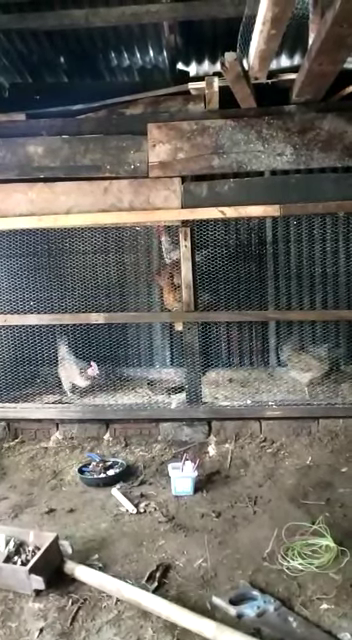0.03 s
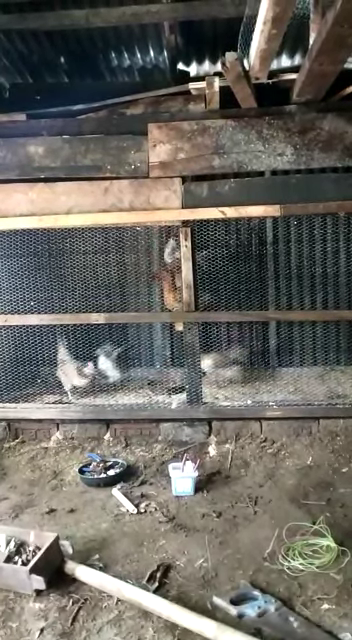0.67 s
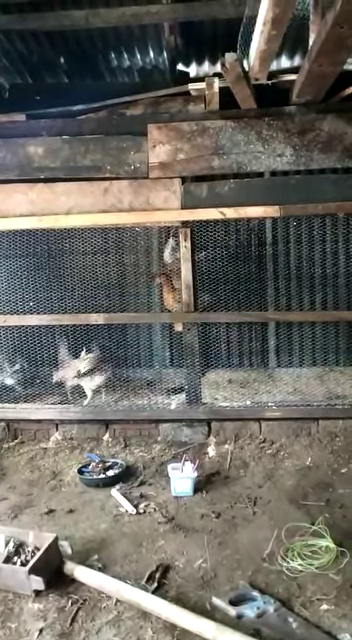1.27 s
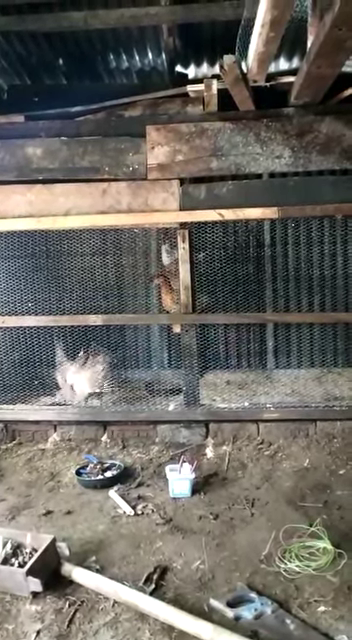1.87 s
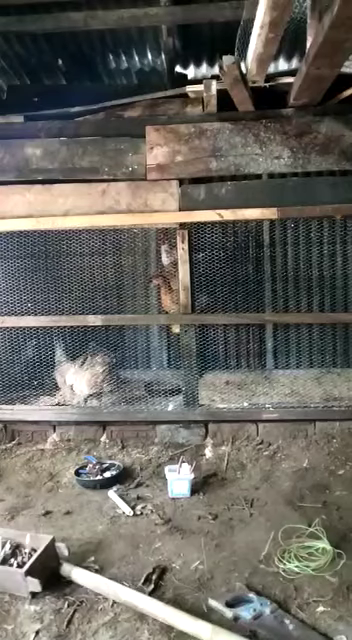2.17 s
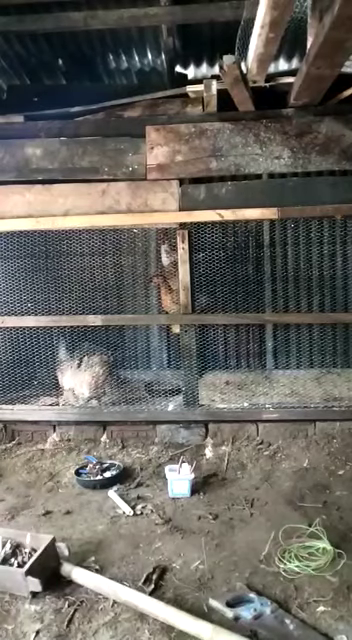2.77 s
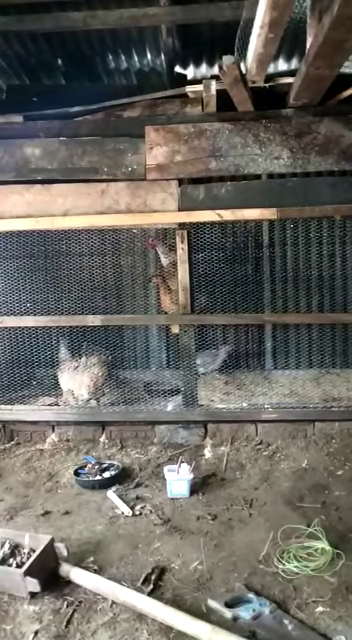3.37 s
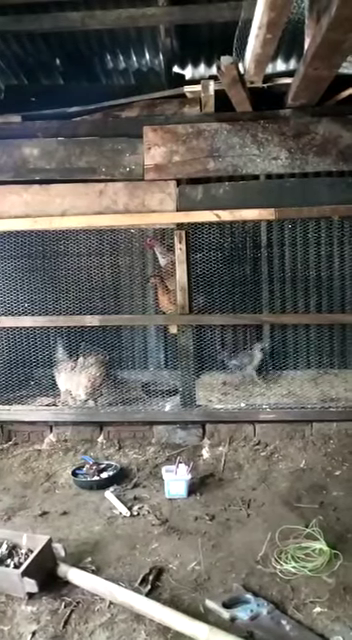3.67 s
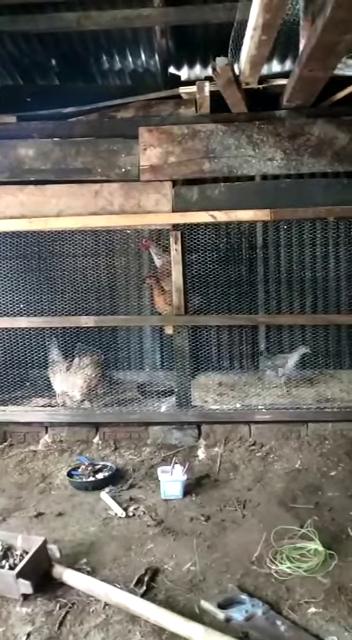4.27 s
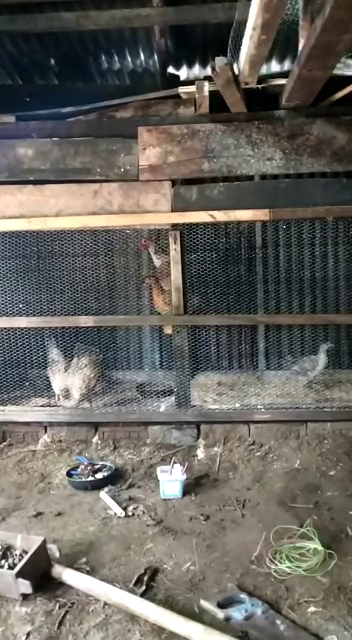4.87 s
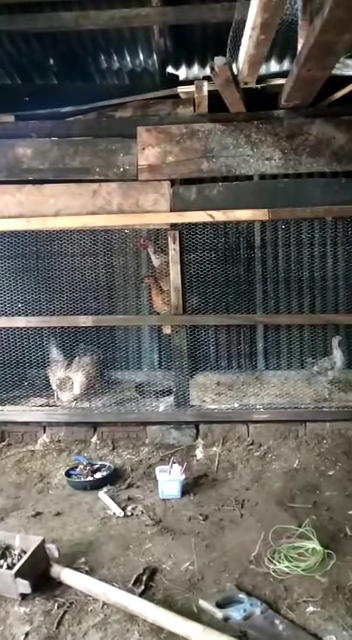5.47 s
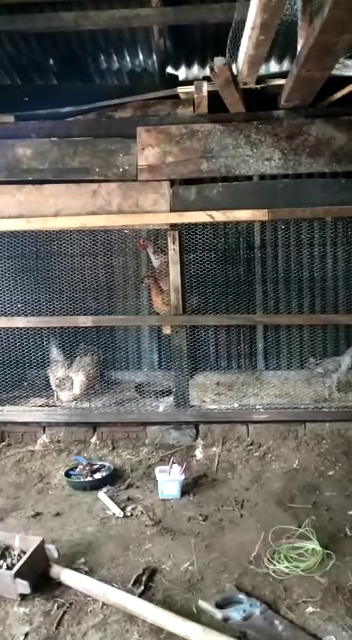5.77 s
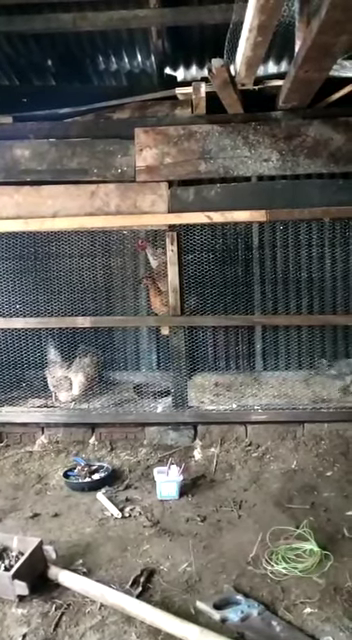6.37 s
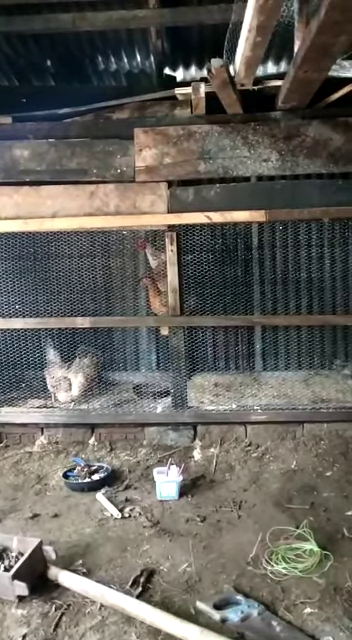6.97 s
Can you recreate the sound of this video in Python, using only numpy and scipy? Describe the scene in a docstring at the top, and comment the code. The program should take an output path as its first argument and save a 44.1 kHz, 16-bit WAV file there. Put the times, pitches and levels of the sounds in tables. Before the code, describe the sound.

From the start, hens scuffle in a wire pen inside a shed, a few steps away and slightly left. Short, harsh squawks come in quick succession until about 1.6 seconds, mixed with crackling wing beats and feet stirring dry litter. A soft landing thud comes at 0.6 seconds, and five dry wing claps fall between 0.7 and 1.3 seconds. From 1.6 seconds one hen settles into low clucks, mostly doubled, three or four a second. Another answers with soft, hoarse notes around 2.6 to 2.8 seconds and two small peeps near 3.2 seconds. After 5 seconds the clucks are quieter, lower and more scattered, continuing to the end at about 7 seconds. Faint foot scratches recur from 3 seconds onward. The shed adds a short echo. Outside, insects keep up a thin, high hiss, and a few distant birds chirp very faintly.

```python
"""Hens scuffle in a wire pen under a tin roof, with harsh squawks, wing beats and feet in the litter.
Then one hen settles into low double clucks while another answers with soft pitched notes.
The voices are pulses of air ringing in the throat; feathers and litter are crackling noise.
The shed adds a short echo. Outside, insects hiss with their wings and small birds chirp faintly."""
import sys
import numpy as np
from scipy import signal
from scipy.fft import rfft, irfft, next_fast_len
from scipy.io import wavfile

SR = 44100
rng = np.random.default_rng(int(sys.argv[2]) if len(sys.argv) > 2 else 0)


def unload_wav(signal):
    """Save mono or channel-first audio to the path in sys.argv[1] as 16-bit WAV at rate SR, clipped to [-1, 1]."""
    wavfile.write(
        sys.argv[1],
        SR,
        np.round(np.clip(np.atleast_2d(signal).T, -1, 1) * 32767).astype(np.int16),
    )


N = 309141
TIME = np.arange(N) / SR

# How alike the two ears hear noise. Each row: frequency in Hz, likeness from 0 to 1.
EAR_LIKENESS = [(150, 1), (350, 0.73), (700, 0.31), (1400, 0), (4000, 0.057), (16000, 0)]
# Squawks. Each row: start and length in seconds, peak time as a share of the length, pitch in Hz,
# pitch fall as a share, second and third harmonic in dB, roughness from 0 to 1, relative level in dB.
SQUAWKS = [(0.0, 0.013, 0.21, 675, -0.054, -8, -1, 0.17, -26.5),
           (0.05, 0.064, .5, 636, 0.0085, -1, -5, 0.44, -23),
           (0.112, 0.084, .3, 593, 0.15, 9, -12, 0.42, -38.5),
           (.178, 0.057, 0.45, 490.7, 0.055, 3.5, 1.5, 0.77, -24.5),
           (.273, 0.066, .6, 543.8, 0.031, -10, 3, 0.67, -23.5),
           (0.347, 0.037, 0.46, 685, 0.066, -16, -16, 0.69, -27.5),
           (0.458, 0.057, 0.53, 562, -.02, -4, 7.5, 0.65, -22.5),
           (0.571, 0.048, 0.62, 495.6, -0.06, -5.5, -6, 0.38, -26),
           (.683, 0.044, 0.63, 588.8, -0.035, -8, -4.5, 0.61, -22.5),
           (0.797, 0.039, 0.57, 494, -0.0018, -5, -8.5, 0.78, -29),
           (.918, 0.038, 0.72, 538.3, 0.028, 3, -2, 0.47, -22),
           (1.013, 0.046, .52, 545, .02, 7.5, -5.5, .6, -22),
           (1.073, 0.045, 0.53, 499.3, 0.057, 0.5, -11, 0.84, -28),
           (1.158, .04, .55, 669.7, 0.039, 3.5, -10.5, 0.55, -19.5),
           (1.275, .049, 0.56, 541, 0.015, 1, -0.5, 0.71, -21.5),
           (1.337, 0.048, 0.52, 602, 0.012, -3, -10.5, 0.61, -22),
           (1.507, 0.053, 0.45, 499.7, -0.014, 7, 8, 0.54, -23.5)]
# Wing strokes and feathers brushing the wire. Each row: start and length in seconds,
# then relative level, bass, upper middle and treble, all in dB.
WING_STROKES = [(0.0, 0.018, -19.5, -27, -4, -9.5), (.055, 0.069, -21, -3, 1, 3.5),
                (0.279, 0.072, -22.5, -10, 0, 1), (0.342, 0.058, -23.5, -15, 0, -5.5),
                (0.464, 0.059, -20, -3.5, 7.5, 7), (0.57, 0.064, -25.5, -13, -6, -4.5),
                (0.693, 0.048, -21.5, -0.5, -2, -4.5), (0.798, 0.038, -32, 6, -16, -17),
                (0.926, 0.045, -23.5, 12, 2.5, 4), (1.019, 0.055, -21, -0.5, 0, -2.5),
                (1.071, 0.065, -28.5, -8.5, 0.5, -7), (1.167, .043, -21, -5, 5.5, 5.5),
                (1.192, 0.049, -23.5, 14.5, 3, 6.5), (1.275, 0.05, -19, 17, 7.5, 9),
                (1.369, 0.046, -27, 23, 3.5, 9.5), (1.512, 0.061, -31.5, 8, 3.5, -2.5),
                (2, 0.04, -36.5, -2, -18, -32)]
# Wing tips clapping. Each row: start in seconds, relative level in dB.
WING_CLAPS = [(0.707, -13.5), (.937, -16), (1.033, -15), (1.176, -13), (1.3, -14.5)]
# The scuffle dying away. Each row: time in seconds, treading level in dB, rustling level in dB.
LITTER_STIR = [(0, -38, -35.5), (.4, -51, -56), (.68, -39.5, -43), (.88, -51, -52.5), (1.1, -43.5, -40),
               (1.35, -32.5, -32.5), (1.52, -41, -47), (1.7, -46, -52.5), (2.0, -46.5, -54.5),
               (2.35, -56, -63.5), (3.6, -58, -69), (4.25, -64.5, -59.5), (7.0, -72, -68)]
# A hen lands on the floor. One row: start and length in seconds, thud level in dB.
LANDING = (0.591, 0.053, -29)
# Feet raking the litter. Each row: start and length in seconds, scratch and thud levels in dB.
FOOT_RAKES = [(3.232, 0.16, -58, -53), (3.828, 0.17, -53.5, -54.5), (4.88, 0.34, -52, -61.5),
              (5.531, 0.12, -52, -65), (5.997, .13, -49, -60), (6.44, 0.15, -51.5, -54.5),
              (6.868, 0.13, -47, -54.5)]
# Insect choruses. Each row: frequency and width in Hz, level in dB.
INSECT_CHORUSES = [(7260, 400, -64), (8330, 1300, -62), (9260, 950, -57)]
# Cluck syllables, mostly in pairs. Each row: time in seconds, pops per second,
# then the relative levels of chest, upper throat and whole syllable in dB.
CLUCKS = [(0.605, 229, 4, -4, -30.5), (1.619, 228, -4.5, 1, -27), (1.891, 230.3, -3, 3.5, -28.5),
          (2.197, 218, 2, -14, -38), (2.229, 241.7, 0, 0, -28.5), (2.424, 211.5, -11, -2, -33),
          (2.458, 239.4, -1.5, -3, -27), (2.616, 226.5, 3.5, -8, -34), (2.657, 252.8, -10, 2.5, -23),
          (2.831, 228, -3, 5, -26), (2.871, 241, -3.5, -2, -22.5), (3.109, 206.4, -1, -13, -32),
          (3.148, 247.2, 2, 1, -24), (3.353, 206.6, -11, 2, -33.5), (3.395, 246.3, 1, 0.5, -23.5),
          (3.552, 206, -6.5, -7, -30.5), (3.588, 242.4, 0.5, -0.5, -24), (3.888, 206.8, -3, -2, -27),
          (3.924, 231.4, -0.5, -6, -26), (4.226, 190, -1.5, -5, -31), (4.259, 212.6, 4, -9, -36),
          (4.456, 172, -9, -6, -30.5), (4.493, 195.6, 0.5, -1, -26.5), (4.725, 184.3, -12, -7, -25.5),
          (4.762, 188.8, 1, 1.5, -28), (5.071, 179, 4, 0, -39), (5.369, 180.2, 3.5, 2.5, -36.5),
          (5.404, 199, 7, -5, -37.5), (5.735, 180.6, 4, 5, -38.5), (5.77, 202, 5, 1, -38),
          (5.924, 185.7, 1.5, -0.5, -34.5), (5.959, 207.5, 7, 5, -45), (6.263, 179, -0.5, 2.5, -30.5),
          (6.507, 181, 0, 0.5, -33.5), (6.915, 193.7, 6, 3, -39), (6.953, 203, 7, -7, -38.5)]
# Hums and far chirps. Each row: start and length in seconds, first and last pitch in Hz,
# relative level in dB.
MURMURS = [(.635, 0.049, 366, 493, -37.5), (5.505, 0.033, 234, 252, -54.5), (6.008, 0.033, 253, 241, -49.5),
           (6.452, 0.05, 310, 270, -53)]
BIRD_CHIRPS = [(1.662, 0.076, 2356, 2260, -56), (2.45, 0.032, 2340, 2360, -59),
               (4.44, 0.204, 4810, 4730, -65), (5.215, 0.096, 2720, 2680, -61.5)]
# Air pushed by a wing. Each row: start and length in seconds, level in dB.
AIR_PUFFS = [(0.912, 0.044, -55)]
# Soft answers. Each row: start and length in seconds, pitch and beak resonance in Hz,
# chest level and relative note level in dB.
SOFT_NOTES = [(2.561, .04, 261, 1560, 15, -43.5), (2.685, 0.043, 311.6, 1290, 6.5, -33.5),
              (2.819, 0.026, 319, 1540, 9, -45.5), (3.75, 0.031, 337, 1670, -1, -38)]
# High notes. Each row: start and length in seconds, pitch in Hz, first harmonic and note level in dB.
PEEPS = [(3.156, 0.051, 617, -28, -33), (3.283, 0.047, 625, -14, -34)]
# Resonances (tones at which a thing rings) of the throat, the wire pen and the boarded corner where
# the hen sits. Each row: frequency and width in Hz, relative level in dB.
OPEN_THROAT = [(500, 140, 1.5), (1074, 450, 8), (1640, 490, 6), (2010, 460, -2.5), (2920, 490, -7),
               (3830, 280, -12), (4900, 330, -5)]
CLUCK_THROAT = [(450, 160, 0.046), (688, 240, 1), (911, 119, -1.1)]
SOFT_THROAT = [(650, 270, 1.5), (1050, 100, 0), (1260, 110, 6), (1570, 140, 0.5)]
PEN_RESONANCES = [(1018, 20, -8), (1101, 24, -6.5), (1366, 23, -8), (1718, 20, -5), (2276, 22, -3),
                  (2670, 22, -2), (2940, 40, -6.5)]
CORNER_RESONANCES = [(249, 23.5, -1.5), (297.5, 15, 0.5), (344, 30, -3), (493, 43, -7), (567, 22, -5),
                     (629, 9.9, -4), (686, 21, -1.5), (796, 24, -14), (860.4, 25, 1.5), (932, 16.6, 0.5),
                     (1030, 35, -2), (1234, 28, 3.5), (1366, 23, -5.5)]
# The tone colour of each noise. Each row: frequency in Hz, relative level in dB.
FEATHER_SPECTRUM = [(60, -43), (150, -36), (250, -11), (700, -3), (1800, 7.5), (3300, -2), (5000, -0.5),
                    (6300, -6.5), (9000, 3), (11500, 0.5), (13000, -2), (16000, -5.5)]
CLAP_SPECTRUM = [(100, -38), (400, -16), (1000, -1), (1500, 14), (2400, -2.5), (3500, -15.5), (5000, -15.5),
                 (6500, -22), (9000, -4.5), (16000, -24)]
TREAD_SPECTRUM = [(40, -47.5), (100, -46.5), (160, -12.5), (240, 0.5), (400, -9), (800, -8), (1500, -18),
                  (3000, -18), (16000, -45)]
RUSTLE_SPECTRUM = [(100, -27), (500, -20), (1500, -9.5), (2500, -4), (5000, -4), (6300, -0.5), (9000, -1),
                   (12000, -1.5), (16000, -4.5)]
AIR_SPECTRUM = [(30, -40), (90, -29.5), (160, -4.5), (250, 6.5), (420, 0), (800, -4), (1500, -5),
                (3000, -2.5), (5000, -4.5), (5700, -5.5), (10500, -2.5), (13000, -9), (16000, -4)]


def from_db(db):
    """Turn decibels into a gain."""
    return 10 ** (np.asarray(db) / 20)


def rms_one(x):
    """Scale a sound to an average strength (rms) of 1."""
    return x / np.sqrt(np.mean(x ** 2) + 1e-20)


def add(track, start_s, sound):
    """Mix a sound into a track."""
    start = max(round(start_s * SR), 0)
    track[..., start:start + sound.shape[-1]] += sound[..., :N - start]


def at_hz(points, hz):
    """Read between the points of a curve, on a log-frequency axis."""
    knots, values = np.transpose(points)
    return np.interp(np.log(hz + 1), np.log(knots), values)


def keep_band(x, hz, kind, order=2):
    """Keep what is below hz ("low") or above it ("high")."""
    return signal.sosfilt(signal.butter(order, hz, kind, fs=SR, output="sos"), x)


def drift(per_s, size):
    """A random wander of about 1 either way, turning per_s times a second."""
    return np.interp(np.arange(size) * per_s / SR, np.arange(size), rng.standard_normal(size))


def resonate(x, modes):
    """Ring several resonances side by side and sum them with alternating signs."""
    out = 0
    for k, (hz, width, db) in enumerate(modes):
        r = np.exp(-np.pi * width / SR)
        poles = [1, -2 * r * np.cos(2 * np.pi * hz / SR), r * r]
        out = out + (-1) ** k * from_db(db) * (1 - r * r) / 2 * signal.lfilter([1, 0, -1], poles, x)
    return out


def swell(length_s, sharpness, crest=0.46):
    """Rise to 1 and fall again, peaking at the share crest of the length."""
    share = np.linspace(0, 1, round(length_s * SR), endpoint=False)
    return np.sin(np.pi * np.interp(share, [0, crest, 1], [0, .5, 1])) ** sharpness


def stereo_noise(spectrum, size=N, ripple_db=0.0, ripple_step_hz=180):
    """Coloured noise, alike in both ears only in the bass; ripple adds random resonances."""
    padded = next_fast_len(size)
    hz = np.fft.rfftfreq(padded, 1 / SR)
    mid, side = rfft(rng.standard_normal((2, padded)))
    alike = at_hz(EAR_LIKENESS, hz)
    both = np.sqrt(1 + alike) * mid + np.sqrt(1 - alike) * side * [[1], [-1]]
    ripple = np.interp(hz / ripple_step_hz, np.arange(len(hz)), rng.standard_normal(len(hz)))
    colour = from_db(at_hz(spectrum, hz) + ripple_db * ripple)
    return rms_one(irfft(both * colour, padded)[:, :size])


def crackle(size, per_s, spread_db):
    """A loudness curve made of many tiny, uneven snaps."""
    hits = rng.random(size) < per_s / SR
    snaps = hits * from_db(spread_db * np.minimum(rng.exponential(1, size), 3))
    energy = signal.lfilter([1], [1, -np.exp(-1 / (.0005 * SR))], snaps ** 2)
    return rms_one(np.sqrt(energy + .3))


def shed(x, early_db, tail_db, early_t60=0.22, tail_t60=0.46, echo_db=-16, echo_s=0.034):
    """Near boards and ground scatter the sound, the far wall echoes, a tail hangs under the roof."""
    t = TIME[:SR // 2]
    walls = [(100, 0), (1500, 3.0), (5000, -4.5), (16000, -9.5)]  # Hz, dB
    # a t60 is the seconds it takes to fade by 60 dB
    early = from_db(early_db - 60 * t / early_t60) / np.sqrt(early_t60)
    tail = from_db(tail_db - 60 * t / tail_t60) / np.sqrt(tail_t60)
    response = stereo_noise(walls, len(t)) * np.hypot(early, tail) * (t > .002) * np.sqrt(5.1 / SR)
    response[:, 0] += 1  # the direct sound
    response[:, round(echo_s * SR)] += from_db(echo_db)
    return signal.fftconvolve(np.atleast_2d(x), response, axes=1)


def voice_box(size, pitch_hz, jitter, doubling, rasp, arch):
    """Membranes pulse on an arched pitch, strong and weak in turn, each letting out a jet of noise."""
    bend = arch * (np.sin(np.linspace(0, np.pi, size)) - np.pi / 4)
    phase = 2 * np.pi * np.cumsum(pitch_hz * (1 + bend + jitter * drift(585, size))) / SR
    pulses = np.cos(np.arange(1, 20)[:, None] * phase).sum(axis=0)
    pulses *= 1 + doubling * np.cos(phase / 2)
    jet = rng.standard_normal(size) * (1 + np.cos(phase))
    return rms_one(pulses) + rasp * rms_one(jet)


def harmonics(hz, levels_db, jitter):
    """Pure tones at whole multiples of a slightly unsteady pitch."""
    phase = 2 * np.pi * np.cumsum(hz * (1 + jitter * drift(400, len(hz)))) / SR
    return sum(from_db(db) * np.sin(k * phase + rng.uniform(0, 2 * np.pi))
               for k, db in enumerate(levels_db, 1))


def squawks(gain_db=-1.3):
    """Short forced cries: a hoarse rasp, with clear tones breaking out at the height of the push."""
    out = np.zeros((2, N))
    for start, length, crest, pitch_hz, fall, second_db, third_db, rough, db in SQUAWKS:
        effort = swell(length, sharpness=1.09, crest=crest)
        size = len(effort)
        hz = pitch_hz * (1 + fall * np.linspace(.5, -.5, size) + .05 * (effort - .75))
        source = voice_box(size, hz, jitter=0.075 * rough, doubling=0.58 * rough,
                           rasp=2.0 * rough, arch=0.02)
        hoarse = effort * rms_one(keep_band(resonate(source, OPEN_THROAT), 560, "high"))
        clear = effort ** 1.8 * harmonics(hz, [-13, second_db, third_db], jitter=0.034 * rough)
        # the hen is on the run, so every cry meets different reflections
        heard = shed(hoarse, early_db=0, tail_db=-23.5) + shed(clear, early_db=-8.5, tail_db=-25)
        add(out, start, from_db(db + gain_db) * heard)
    return out


def feather_rattle(x):
    """Feather shafts snap in the middle range while their vanes crackle in the treble."""
    low = keep_band(x, 3500, "low", order=1)
    shafts = crackle(x.shape[-1], per_s=900, spread_db=3)
    vanes = crackle(x.shape[-1], per_s=700, spread_db=3.4)
    return keep_band(low * shafts + (x - low) * vanes, 150, "high", order=4)


def wings(gain_db=-0.6, shade_db=-11, clap_rise_s=0.0047, clap_decay_s=0.01):
    """Each stroke swishes through the feathers; the hardest end in a dry clap of the wing tips."""
    out = np.zeros((2, N))
    for start, length, db, bass_db, middle_db, treble_db in WING_STROKES:
        speed = swell(length, sharpness=0.72, crest=0.44)
        tone = [(450, bass_db), (1300, 0), (2800, middle_db), (5000, middle_db), (9000, treble_db)]
        colour = [(hz, level + at_hz(tone, hz)) for hz, level in FEATHER_SPECTRUM]
        quills = stereo_noise(colour, len(speed), ripple_db=4.5)  # new resonances on every stroke
        swish = from_db(db + gain_db) * speed * feather_rattle(quills)
        add(out, start, shed(swish, early_db=-3, tail_db=-11.5))
    t = TIME[:SR // 20]
    slap = np.minimum(t / clap_rise_s, 1) * np.exp(-t / clap_decay_s)
    for start, db in WING_CLAPS:
        clap = keep_band(slap * stereo_noise(CLAP_SPECTRUM, len(t)), 200, "high")
        add(out, start, shed(from_db(db) * clap, early_db=-9, tail_db=-14))
    # the treble is beamed to the left, so the right side is duller
    left, right = out
    dull = keep_band(right, 5140, "low", order=1)
    shade = from_db(shade_db)
    return np.array([left, shade * right + (1 - shade) * dull])


def pen(x, travel_s=.009):
    """The pen rings a moment after the loud scuffle."""
    out = x.copy()
    add(out, travel_s, sum(resonate(x, [mode]) for mode in PEN_RESONANCES))
    return out


def litter():
    """Feet tread dully and rustle the dry litter, with one landing and single rakes on top."""
    times, tread_db, rustle_db = np.transpose(LITTER_STIR)
    tread = from_db(np.interp(TIME, times, tread_db))
    scratch = from_db(np.interp(TIME, times, rustle_db))
    start, length, thud_db = LANDING
    add(tread, start, from_db(thud_db) * swell(length, sharpness=0.95))
    for start, length, scratch_db, thud_db in FOOT_RAKES:
        push = swell(length, sharpness=1)
        catching = from_db(drift(147, len(push)))  # the claws catch and slip
        add(scratch, start, from_db(scratch_db) * push * catching)
        add(tread, start, from_db(thud_db) * push)
    thuds = tread * from_db(2.0 * drift(50, N)) * stereo_noise(TREAD_SPECTRUM)
    rustle = scratch * crackle(N, per_s=900, spread_db=3.2) * stereo_noise(RUSTLE_SPECTRUM)
    return thuds + rustle * from_db([[2.5], [-1]])  # louder on the left


def insect_buzz(size, hz, width_hz):
    """The narrow, noisy ring of an insect's wings, a little to the left."""
    mode = [(hz, width_hz, 0)]
    ring = resonate(resonate(rng.standard_normal((2, size)), mode), mode)
    return rms_one(ring) * from_db([[1.1], [-1.1]])


def outdoors(air_db=-53.5, nearest_db=-57.5):
    """Still air, choruses of shrill insects and the short phrases of the nearest one."""
    out = from_db(air_db) * stereo_noise(AIR_SPECTRUM)
    for hz, width, db in INSECT_CHORUSES:
        out += insect_buzz(N, hz, width) * from_db(db + 2.4 * drift(8.4, N))
    phrase = swell(.33, sharpness=0.14)
    for start in np.arange(1.8, 7, .37):
        hz = 9250 + 180 * rng.standard_normal()
        buzz = phrase * insect_buzz(len(phrase), hz, width_hz=480)
        add(out, start, buzz * from_db(nearest_db + 2.2 * drift(60, len(phrase))))
    return out


def clucks(length_s=0.02806, lead_s=0.005474, fall=.2, unevenness=.13, gain_db=-15.0, corner_db=2):
    """A few uneven pops in the closed throat slow down as the push of air ends; the corner rings on."""
    out = np.zeros((2, N))
    effort = swell(length_s, sharpness=0.55)
    size = len(effort)
    for time, pulse_hz, chest_db, upper_db, db in CLUCKS:
        stretch = np.exp(0.037 * rng.standard_normal())  # the neck is never held twice alike
        pop_hz = pulse_hz * np.exp(np.linspace(fall, -fall, size) + unevenness * drift(299, size))
        cycles = np.cumsum(pop_hz) / SR + rng.random()
        pops = np.diff(np.floor(cycles), prepend=0) * from_db(3.2 * drift(408, size))  # one a cycle
        source = np.pad(effort * (pops + .014 * rng.standard_normal(size)), (0, size))
        throat = [(hz * stretch, width, level) for hz, width, level in CLUCK_THROAT]
        voice = resonate(source, [(265, 90, chest_db)] + throat + [(1240, 620, upper_db - 10.0)])
        voice = keep_band(voice, 1155, "low", order=4)
        voice = rms_one(keep_band(voice, 204, "high", order=6))
        add(out, time - lead_s, shed(from_db(db + gain_db) * voice, early_db=-5, tail_db=-12))
    ringing = sum(resonate(out, [mode]) for mode in CORNER_RESONANCES)
    return from_db(-1.5) * out + from_db(corner_db) * ringing


def glides(rows, waver, flutter_db, sharpness):
    """Nearly pure sliding notes with a fast quaver."""
    out = np.zeros(N)
    for start, length, start_hz, end_hz, db in rows:
        shape = swell(length, sharpness)
        size = len(shape)
        hz = np.linspace(start_hz, end_hz, size) * (1 + waver * drift(350, size))
        tone = np.sin(2 * np.pi * np.cumsum(hz) / SR)
        add(out, start, from_db(db + flutter_db * drift(97, size)) * shape * tone)
    return out


def murmurs():
    """A hen hums low between her clucks, with her beak shut."""
    hums = glides(MURMURS, waver=0.049, flutter_db=1.5, sharpness=0.96)
    return shed(hums, early_db=-3.5, tail_db=-3.0)[:, :N]


def wing_puff():
    """Air pushed by a wing arrives as a low thud."""
    gust = np.zeros(N)
    for start, length, db in AIR_PUFFS:
        add(gust, start, from_db(db) * swell(length, sharpness=1))
    return gust * rms_one(keep_band(rng.standard_normal((2, N)), 60, "low"))


def birds(gain_db=-3):
    """Thin whistles from far off, blurred by a quaver and by reflections on the way."""
    song = glides(BIRD_CHIRPS, waver=.036, flutter_db=2.5, sharpness=1)
    return from_db(gain_db) * shed(song, early_db=11.5, tail_db=11)[:, :N]


def soft_notes(gain_db=1.0):
    """Little hoarse notes through a nearly closed beak; the pitch rises and sinks with the push."""
    out = np.zeros((2, N))
    for start, length, pitch_hz, beak_hz, chest_db, db in SOFT_NOTES:
        effort = swell(length, sharpness=0.85)
        source = voice_box(len(effort), pitch_hz, jitter=0.03, doubling=0.12, rasp=0.66, arch=0.057)
        throat = resonate(source, SOFT_THROAT + [(280, 110, chest_db)])
        voice = throat + resonate(throat, [(beak_hz, 200, 3)])
        note = rms_one(keep_band(keep_band(voice, 2100, "low", order=6), 150, "high"))
        heard = shed(effort * note, early_db=-7, tail_db=-17, early_t60=.12, echo_db=-22)
        add(out, start, from_db(db + gain_db) * heard)
    return out


def peeps(arch=.045):
    """High, clean notes carried by the second harmonic, at twice the pitch."""
    out = np.zeros((2, N))
    for start, length, pitch_hz, first_db, db in PEEPS:
        effort = swell(length, sharpness=1.35)
        hz = pitch_hz * (1 + arch * (effort - effort.mean()))
        voice = rms_one(harmonics(hz, [first_db, 0, -26], jitter=.017))
        add(out, start, from_db(db) * shed(effort * voice, early_db=-8.5, tail_db=-28, echo_db=-28))
    return out


def scene():
    """The hens sound inside the shed, a little to the left, over the quiet outdoors."""
    leftward = from_db([[.3], [-.3]])
    talk = (clucks() + soft_notes() + peeps() + murmurs()) * leftward
    scuffle = pen(squawks() * leftward + wings())
    return scuffle + talk + litter() + wing_puff() + birds() + outdoors()


def record(dry):
    """The treble above 15750 Hz is cut steeply."""
    return signal.sosfilt(signal.ellip(12, .1, 90, 15750, fs=SR, output="sos"), dry)


dry = scene()
out = record(dry)
unload_wav(out)
```